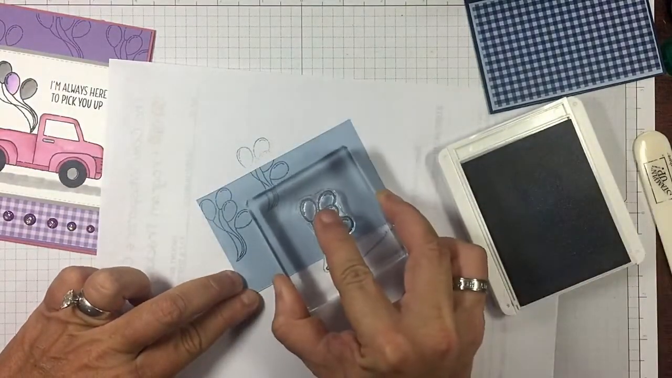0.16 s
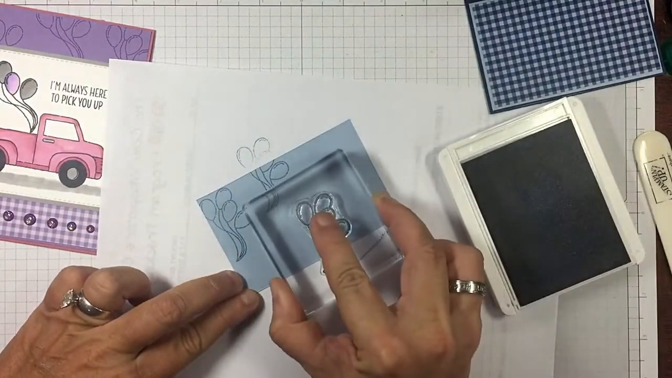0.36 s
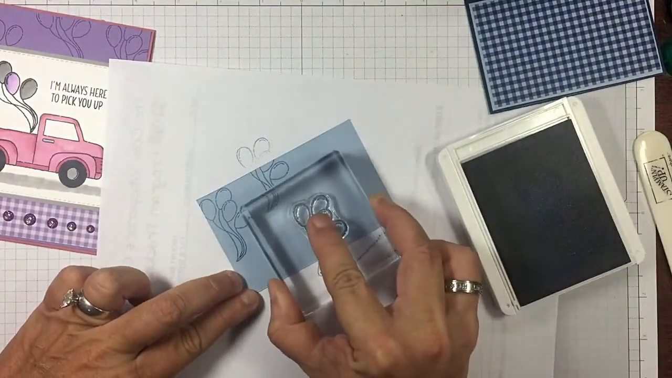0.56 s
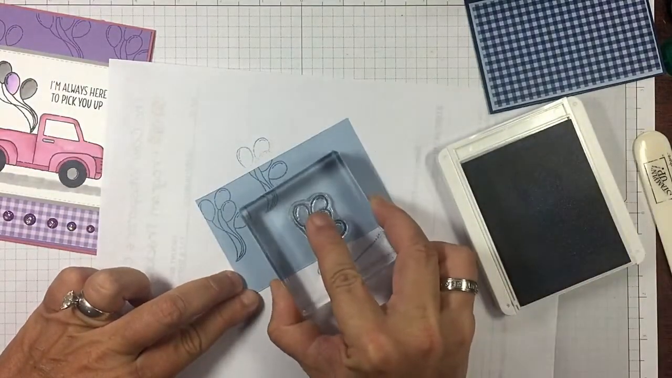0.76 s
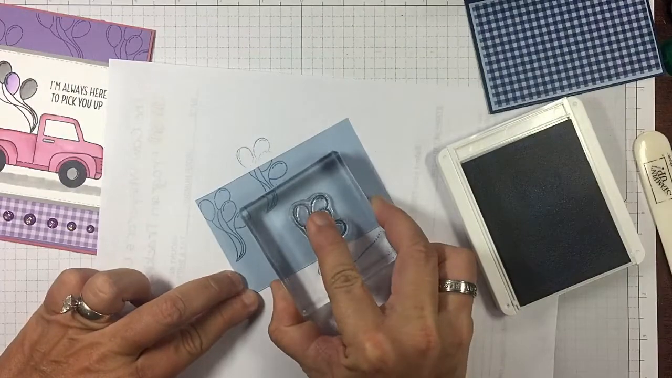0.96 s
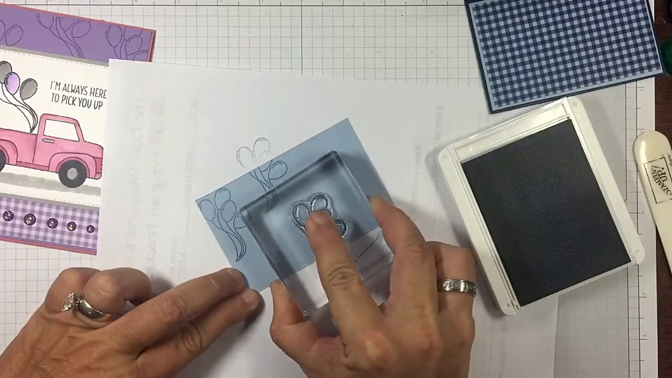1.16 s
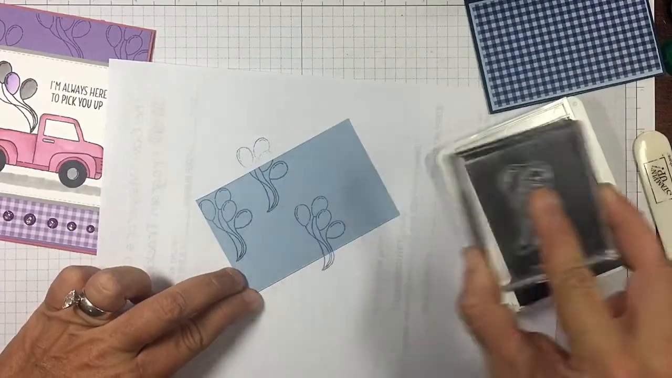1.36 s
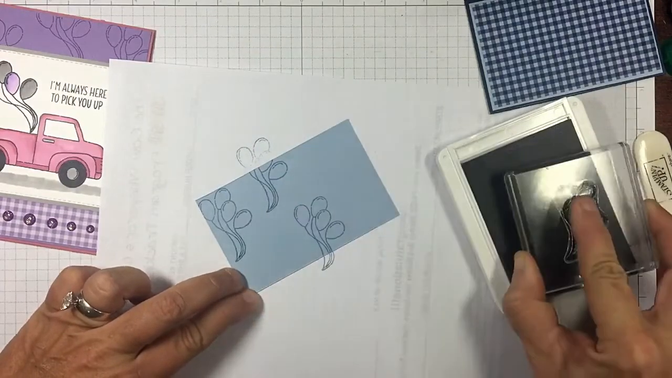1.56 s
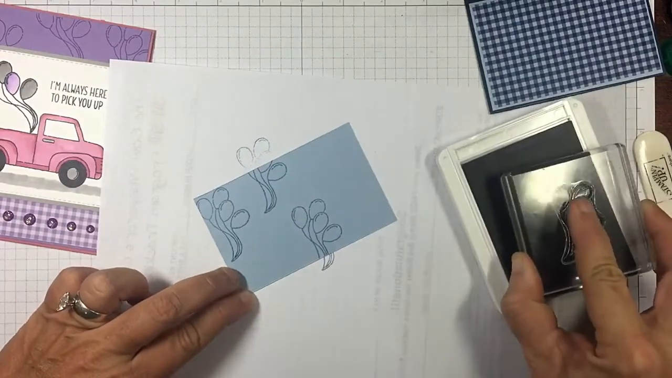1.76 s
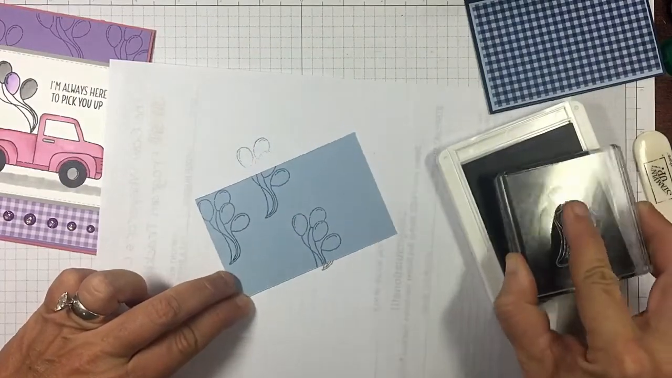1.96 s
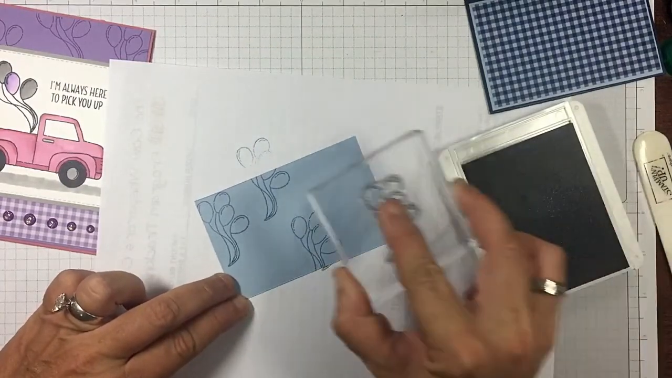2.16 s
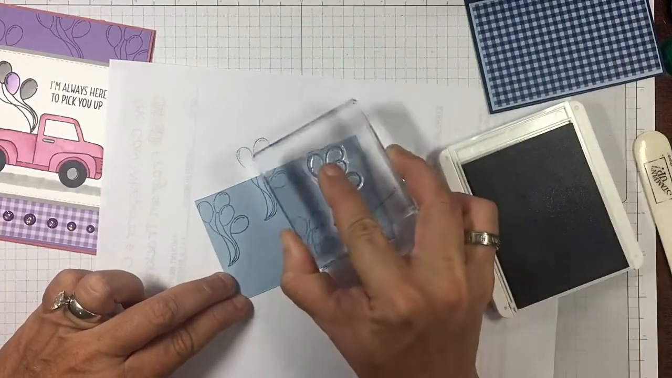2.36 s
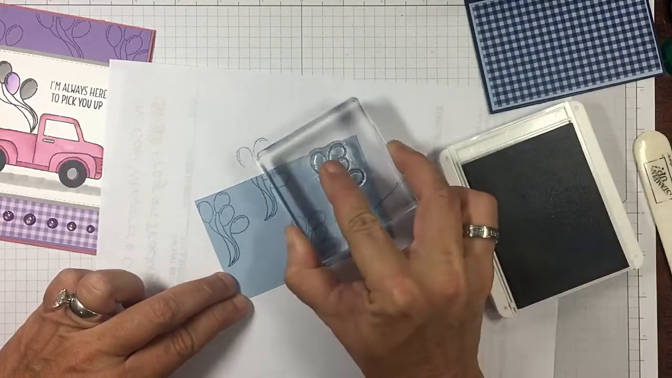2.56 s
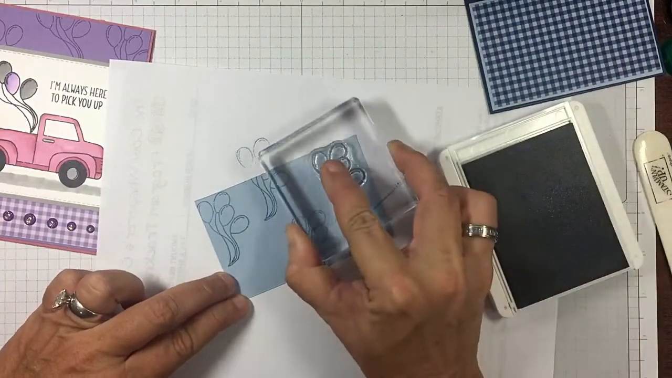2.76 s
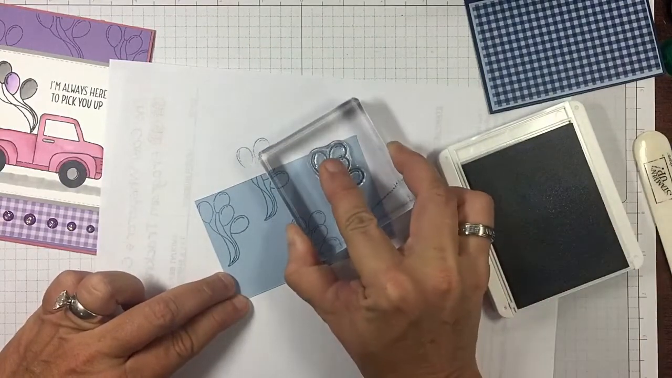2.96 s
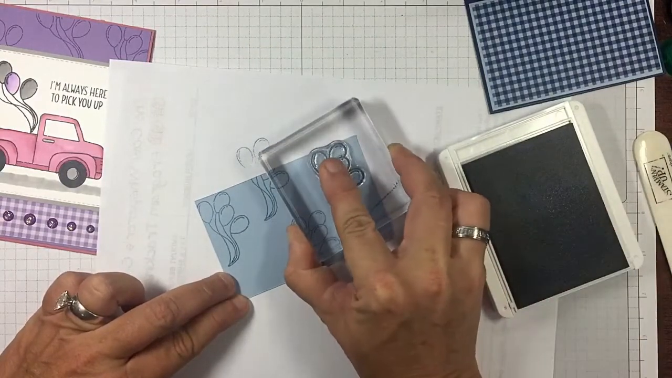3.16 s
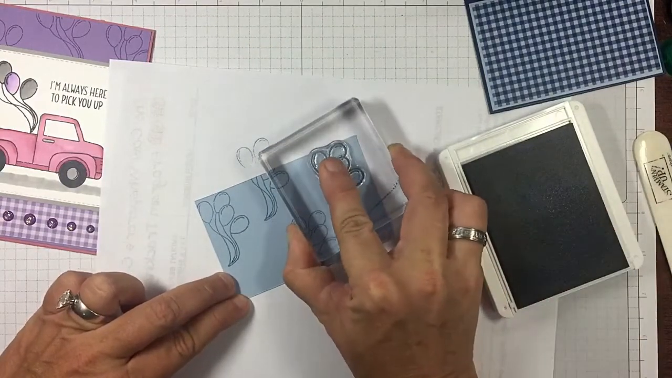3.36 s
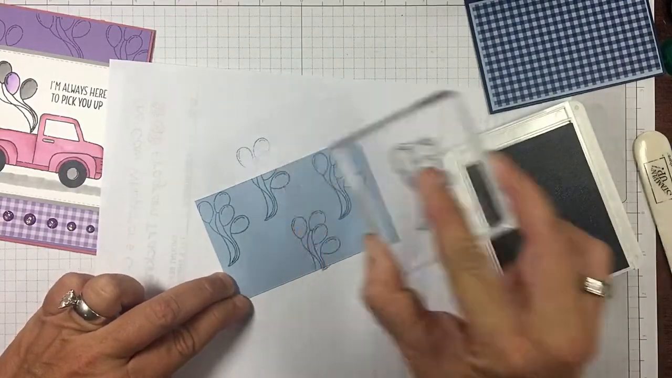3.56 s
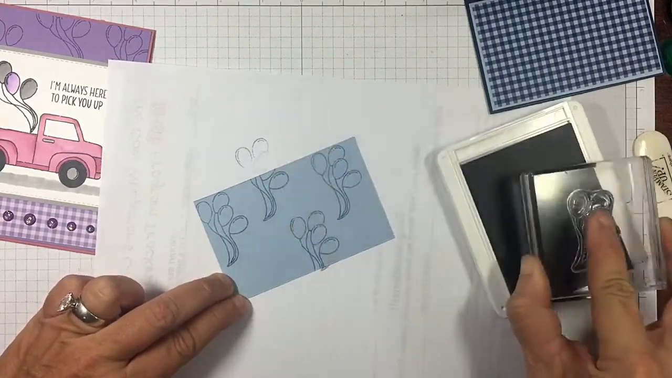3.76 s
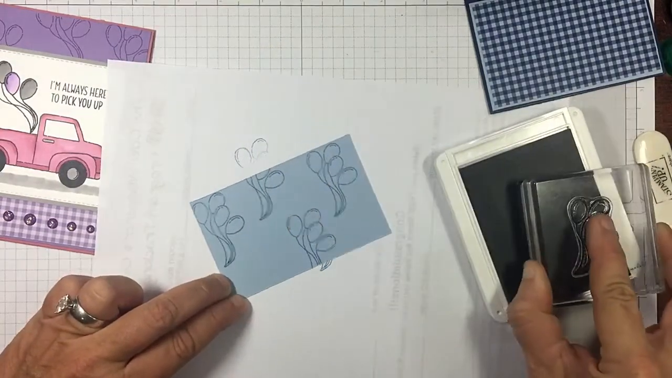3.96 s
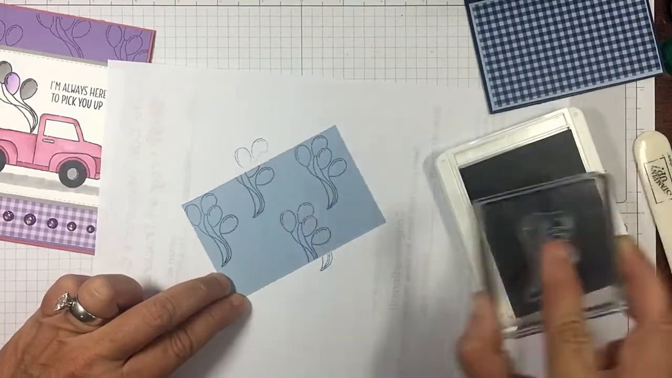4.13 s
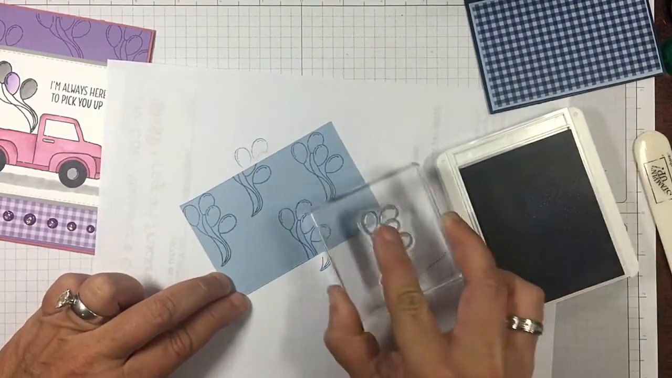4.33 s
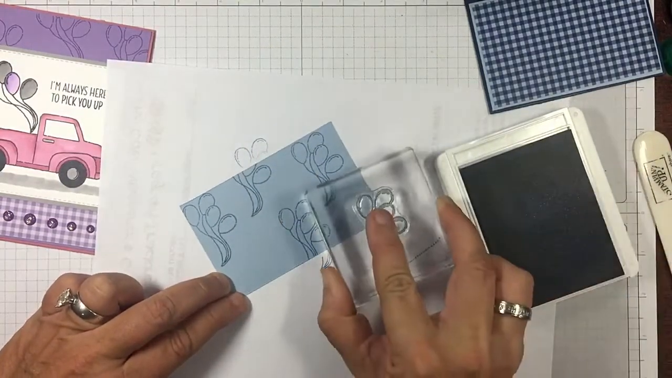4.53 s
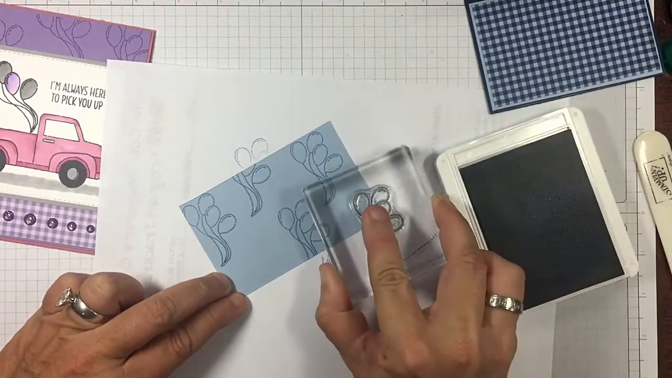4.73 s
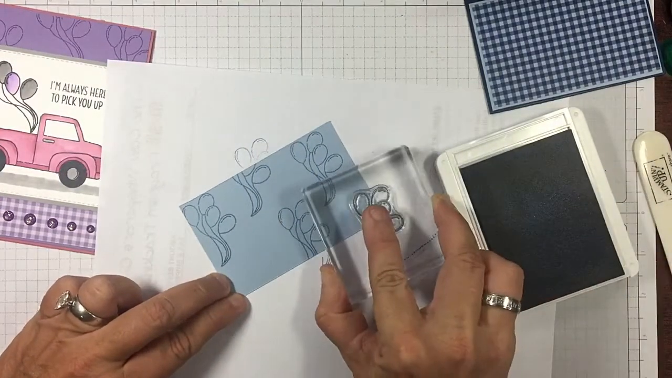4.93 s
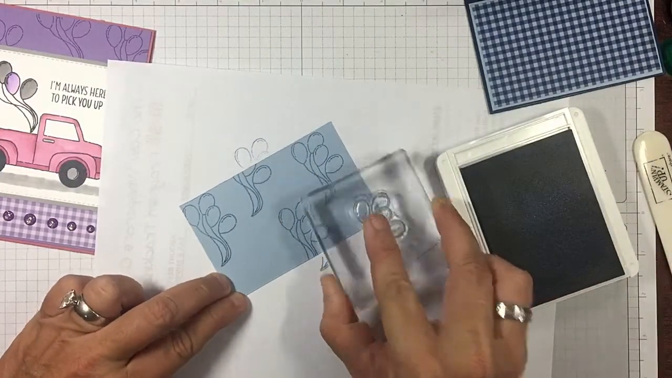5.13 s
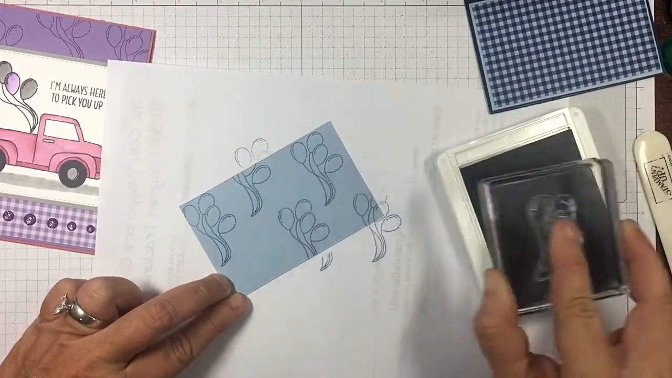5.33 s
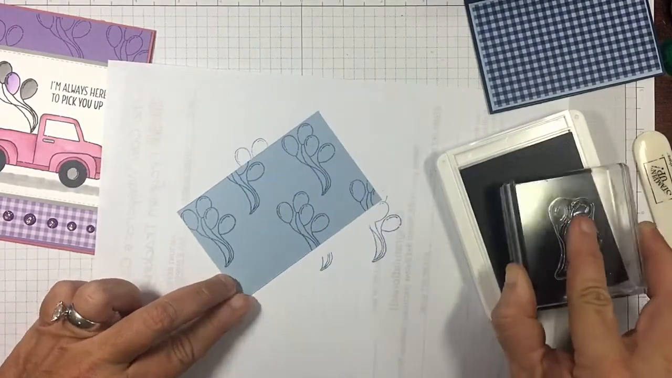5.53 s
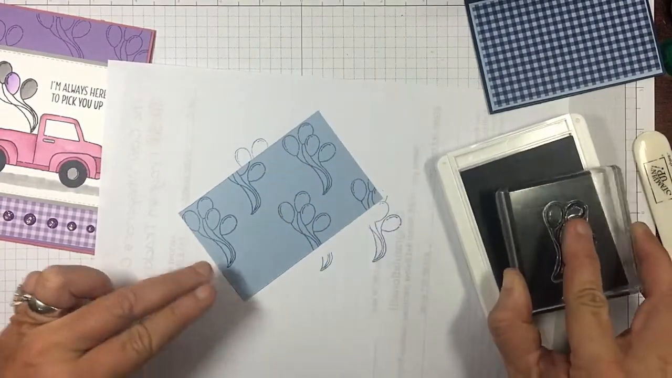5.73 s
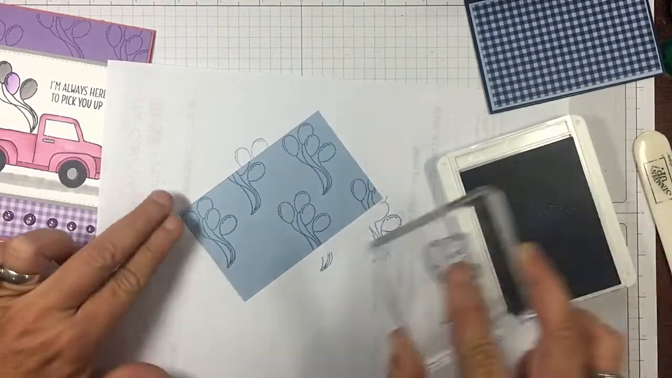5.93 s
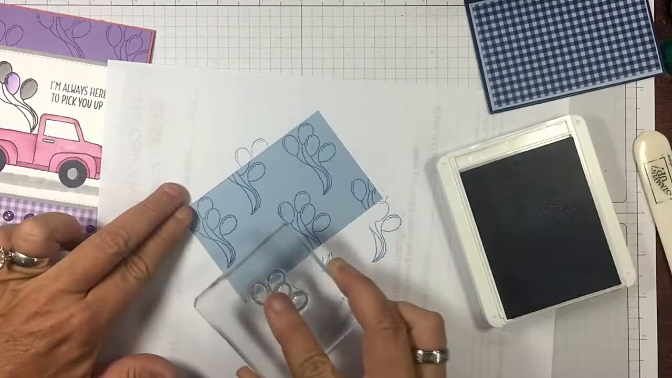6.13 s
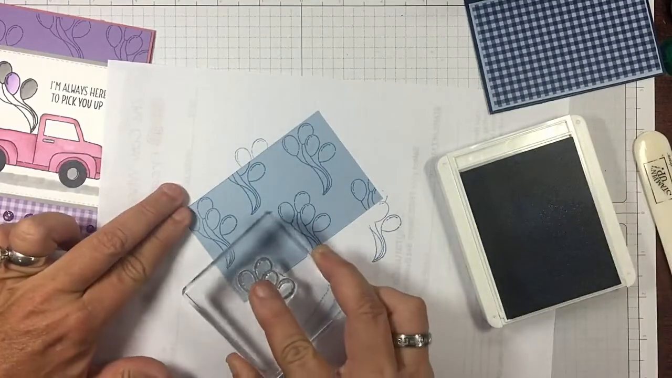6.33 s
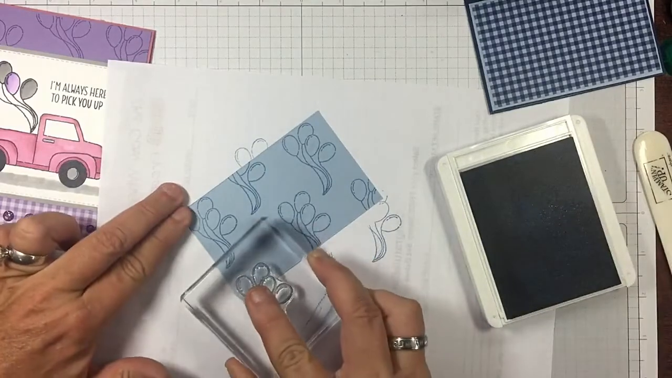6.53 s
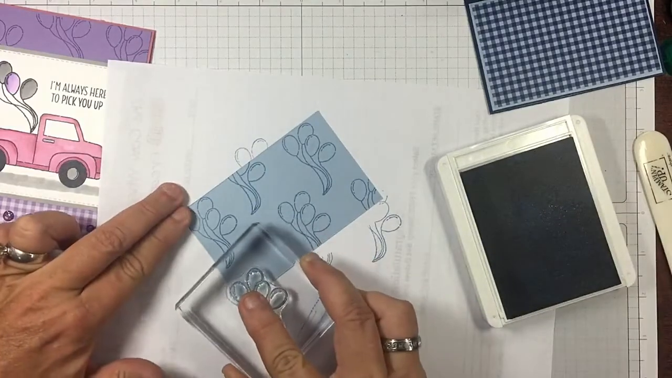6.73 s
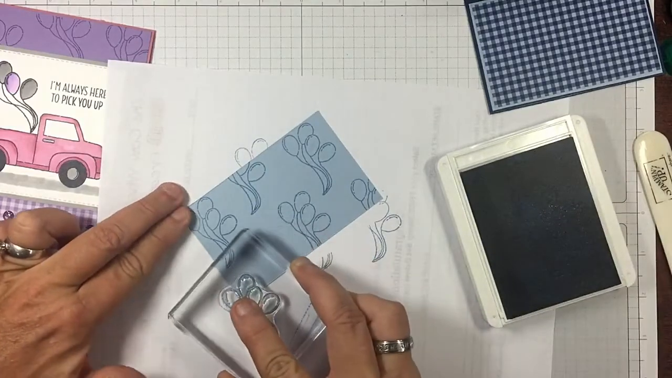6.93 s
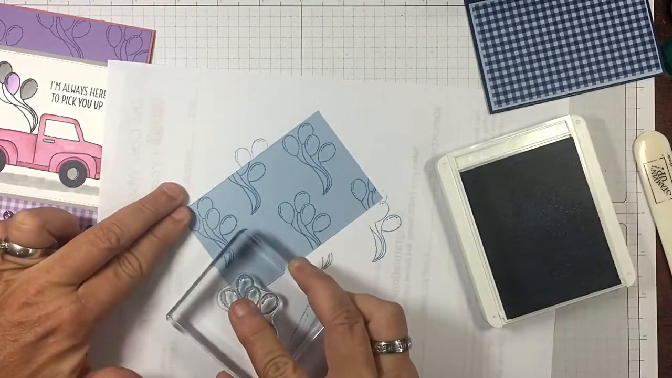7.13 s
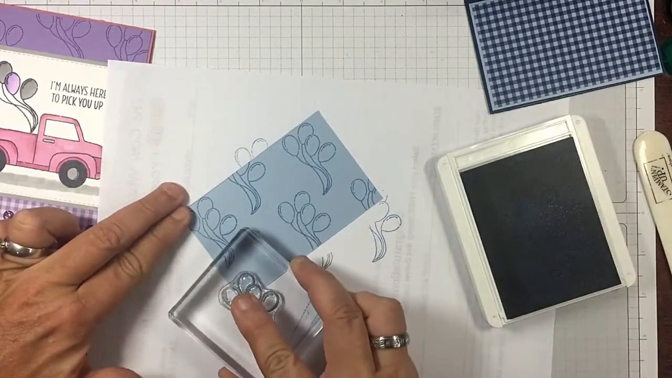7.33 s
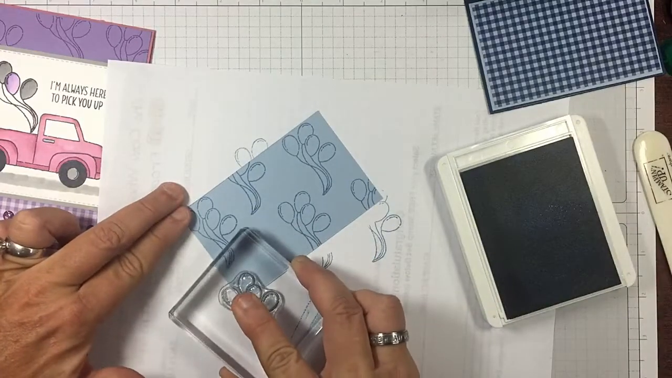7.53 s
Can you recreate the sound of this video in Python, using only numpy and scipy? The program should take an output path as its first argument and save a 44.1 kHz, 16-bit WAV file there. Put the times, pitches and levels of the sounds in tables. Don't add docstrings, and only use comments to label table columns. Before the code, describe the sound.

In a quiet room, a stamp block presses card with a low tabletop thump, then peels away with a sharp snap. Three quick plastic clacks follow on the ink pad, each with a woody thud. A faint press and light peel come next, two more taps, a heavy press, a softer peel, three taps, and a final deep press. The close microphone picks up table vibration over faint hiss.

```python
import sys
import numpy as np
from scipy import signal
from scipy.io import wavfile
from scipy.ndimage import uniform_filter1d

SR = 44100
rng = np.random.default_rng(int(sys.argv[2]) if len(sys.argv) > 2 else 0)


def decibels_to_gain(level_db):
    exponent = np.asarray(level_db, float) / 20
    return 10 ** exponent


def wav_out(sig):
    wavfile.write(sys.argv[1], SR, np.round(np.clip(np.atleast_2d(sig).T, -1, 1) * 32767).astype(np.int16))


N = 339129

# (frequency [Hz], density [dB per Hz])
HISS_SPECTRUM = [(88, 3), (150, -6), (230, -5), (263, -10.5), (296, -6.5), (333, -7), (797, -12),
                 (878, -11.5), (1400, -12.5), (1630, -10.5), (1870, -11), (2060, -11), (4850, -18.5),
                 (13300, -24), (15600, -26)]
# (frequency [Hz], density [dB per Hz])
RUMBLE_SPECTRUM = [(11, -58), (18, -28), (21, -16), (31, -8), (54, 4), (98, -2.5), (129, -7.5), (151, -8.5),
                   (250, -12.5), (320, -14.5), (550, -120)]

# (time [s], snap [dB], crackle [dB], crackle tail [s], creak [dB])
PEELS = [
    (1.255, -22, -58, 0.0096, -58),
    (3.1343, -69, -91, .004, -83),
    (3.5231, -39, -66.5, 0.0031, -81),
    (3.5300, -31, -62, 0.0094, -93),
    (5.178, -42, -65.5, 0.0073, -87),
]
# (time [s], level [dB], pitch [Hz], length [s])
FIZZES = [
    (2.012, -70.5, 4840, 0.0073),
    (3.869, -62, 4400, .0033),
    (4.05, -69.5, 10400, .012),
    (4.053, -69, 5000, 0.02),
    (4.114, -71, 4020, 0.014),
    (4.765, -66, 2500, 0.0034),
    (5.514, -53, 4170, 0.0017),
    (5.73, -71, 5600, .0041),
    (5.863, -68.5, 5130, .0069),
]
# (frequency [Hz], width [Hz], level [dB])
CARD_MODES = [(1470, 380, -4.5), (2810, 87, -10.5), (3490, 1670, 5), (4230, 1060, 0), (4960, 780, -7),
              (8000, 3100, -9), (10400, 680, -15), (11150, 1200, -11.5)]

# (time [s], level [dB], hardness [dB per octave], swell [s])
LANDINGS = [
    (1.596, -36, -1.5, .0081),
    (1.797, -30.5, 0, 0.0052),
    (1.932, -32.5, .5, .003),
    (3.8686, -30.5, -2, 0.005),
    (4.011, -33, 0.5, 0.0037),
    (5.527, -29.5, -2, 0.011),
    (5.67, -38.5, -3.5, 0.0092),
    (5.798, -33.5, -4, 0.0031),
]
# (time [s], level [dB], table sway [dB], hardness
# [dB per octave], swell [s])
LIFTS = [
    (1.705, -40, -47, 0.5, 0.0087),
    (1.872, -45, -62, 4, 0.03),
    (2.038, -55, -45, 9, .0035),
    (3.942, -44, -45, 1.5, 0.019),
    (4.134, -46.5, -45, 1, 0.007),
    (5.606, -41.5, -57, 5.5, 0.0055),
    (5.745, -39, -46, -2.5, .0044),
    (5.876, -37, -40.5, 4, 0.0041),
    (7.341, -47, -80, 10.5, 0.0052),
]
# (time [s], level [dB], ring factor)
PRESSES = [
    (0.6961, -25, 1.37),
    (4.7783, -22, 1.38),
    (7.3351, -22, 1.44),
]
# (time [s], level [dB], ring factor)
CORNER_PRESSES = [
    (2.9556, -46, 1.1),
]
# (time [s], level [dB], table sway [dB], hardness [dB per octave])
NUDGES = [(.44, -67, -62, -4), (.812, -57.5, -75, -5), (0.874, -58, -81, -7), (1.04, -60.5, -68, 5),
          (1.267, -51, -80, 19), (2.099, -69.5, -69, -14), (2.149, -74, -56, -12), (3.088, -61, -74, 5),
          (3.189, -81, -56.5, -13), (3.540, -50, -75, 13.5), (4.63, -53, -63, 10), (4.861, -54, -57, -2),
          (4.906, -58.5, -64, -12.5), (4.958, -61, -76, -12), (5.202, -55.5, -64, 4),
          (5.433, -55.5, -61, 6), (5.949, -55, -51, -5.5), (7.409, -53, -79, -3), (7.491, -57.5, -58, -6.5)]
# (frequency [Hz], t60 [s], landing [dB], lift [dB], press [dB], corner press [dB])
TABLE_MODES = [(101.2, 0.13, 0, -10, -4.5, 8.5), (114, 0.041, -53, -16, -7.5, -3),
               (194, 0.078, -4, -1.5, -10, 3.5), (273.8, 0.075, -10, -3.5, -10, -5.5),
               (317.4, 0.11, -10.5, -9, -26.5, -43), (387.2, 0.11, -12.5, -26, -38.5, -38),
               (456, 0.076, -40, -48, -33, -40), (562, 0.064, -11.5, -17, -38, -38),
               (650, 0.058, -48, -20.5, -38, -44)]
# (frequency [Hz], t60 [s], level [dB])
SWAY_MODES = [(52.16, 0.74, -7.5), (65.6, 0.21, -5)]
# (bass lag [s per octave], first arrival before crest [s], damping by the hand [s])
ARRIVALS = [(0.0062, 0.011, 0.19), (0.008, 0.0206, 0.24), (0.0056, 0.0144, 0.09), (0.0059, .016, 0.045)]

# (time [s], level [dB], pitch [Hz], length [s], hard edge [dB])
STRIKES = [(1.578, -39, 840, 0.0049, 1), (1.781, -29.5, 1110, 0.0049, -12),
           (1.7815, -37, 2560, 0.00287, 15.5), (1.859, -28, 920, 0.0043, -22),
           (1.9174, -20.5, 1120, .0013, -3), (1.9178, -37, 1900, 0.00036, 14),
           (3.854, -31, 1360, 0.00257, 11), (3.8552, -25, 740, .0023, 14.5), (3.92, -37.5, 1420, 0.0067, 9),
           (3.997, -31, 720, 0.0019, 14), (3.9976, -32, 1800, 0.0012, -10),
           (5.512, -28.5, 1900, 0.00294, 2), (5.516, -28.5, 930, 0.0032, 6),
           (5.656, -38.5, 1300, 0.0027, -6), (5.782, -38, 1660, 0.0043, 5), (5.858, -42.5, 1300, 0.013, 1),
           (6.442, -61, 1500, .0025, -6)]
# (time [s], level [dB], pitch [Hz], length [s])
SCRAPES = [(0.676, -42, 675, 0.0044), (1.691, -42, 1800, 0.0091), (1.845, -44, 1400, .0037),
           (1.908, -51, 850, 0.0052), (2.004, -47, 1370, 0.009), (2.941, -71, 520, 0.0015),
           (3.517, -51, 1430, .006), (4.036, -50, 1650, 0.0091), (4.104, -48, 1300, 0.01),
           (4.766, -52.5, 586, 0.0033), (5.591, -38.5, 740, 0.0081), (5.723, -38, 755, 0.011),
           (5.808, -54, 1600, 0.014), (5.847, -46.5, 1220, 0.0091), (7.322, -51, 1010, 0.0038)]
# (frequency [Hz], width [Hz], level [dB])
CASE_MODES = [(520, 290, 7), (720, 190, 0.5), (873, 276, 5), (1007, 280, 1.5), (1420, 262, 6),
              (1650, 148, -3.5), (1874, 120, 0), (2560, 87, -21), (3330, 210, -23.5), (4360, 240, -33),
              (5700, 470, -39)]

LANDING, LIFT, PRESS, CORNER_PRESS = range(4)
PEEL_PRE_S, THUD_PRE_S, CLATTER_PRE_S = 0.06, 0.04, 0.03


def evened(x):
    return x / np.sqrt(np.mean(x ** 2) + 1e-20)


def add(mix, time_s, sound):
    part = mix[round(time_s * SR):][:len(sound)]
    part += sound[:len(part)]


def resonate(x, hz, width_hz):
    turn = np.exp(2j * np.pi * hz * np.arange(len(x)) / SR)
    r = np.exp(-np.pi * width_hz / SR)
    smoother = 3 * [[1 - r, 0, 0, 1, -r, 0]]
    return 2 * (turn * signal.sosfilt(smoother, x / turn)).real


def hump(t, before_s, after_s):
    rise = np.exp(-0.5 * (t / before_s) ** 2)
    fall = np.exp(-np.maximum(t, 0) / after_s)
    return np.where(t < 0, rise, fall)


def gritty(count, density):
    force = rng.standard_normal(count) * rng.exponential(1, count)
    return force * (rng.random(count) < density)


def noise(spectrum, patchy_db):
    bin_hz = np.fft.rfftfreq(2048, 1 / SR)
    real, imag, patches = rng.standard_normal((N // 512 + 5, 1025, 3)).T
    patches = uniform_filter1d(patches, size=20, axis=0)
    patches = evened(uniform_filter1d(patches, size=12, axis=1))
    hz, db = np.transpose(spectrum)
    colour_db = np.interp(np.log(bin_hz + 1), np.log(hz), db, left=-90, right=-90)
    z = (real + 1j * imag) * decibels_to_gain(colour_db[:, None] + patchy_db * patches)
    return evened(signal.istft(z, nperseg=2048, noverlap=1536)[1][:N])


def room_floor():
    return decibels_to_gain(-69) * noise(HISS_SPECTRUM, 1.0) + decibels_to_gain(-67) * noise(RUMBLE_SPECTRUM, 0.92)


def reflections(x):
    t = np.arange(SR // 3) / SR
    taps_per_s, first_s = 2000, 0.004
    taps = rng.choice([-1., 1.], len(t)) * (rng.random(len(t)) < taps_per_s / SR) * (t > first_s)
    dull = signal.lfilter([0.2], [1, -0.8], taps)
    tail = dull * decibels_to_gain(-60 * t / 0.33) + 1.1 * taps * decibels_to_gain(-60 * t / 0.17)
    return signal.fftconvolve(x, tail / np.linalg.norm(tail))[:N]


def fizz(db, hz, length_s):
    t = np.arange(SR // 5) / SR - PEEL_PRE_S
    band = resonate(rng.standard_normal(len(t)), hz, 0.51 * hz)
    return decibels_to_gain(db) * evened(band) * hump(t, length_s, length_s)


def peel(snap_db, crackle_db, crackle_tail_s, creak_db):
    t = np.arange(SR // 5) / SR - PEEL_PRE_S
    grit = gritty(len(t), 0.6)
    click = 1.5 * (abs(t) < 0.5 / SR)
    blow = click + 0.3 * rng.standard_normal(len(t)) * hump(t, 0.00015, 0.0004)
    snap, crackle, creak = np.zeros((3, len(t)))
    for hz, width_hz, db in CARD_MODES:
        snap += np.sign(hz - 2000) * decibels_to_gain(db) * evened(resonate(blow, hz, 1.57 * width_hz))
        fade = hump(t, 0.003, crackle_tail_s * min(4500 / hz, 1))
        crackle += decibels_to_gain(db) * evened(resonate(grit, hz, 1.3 * width_hz)) * fade
    for hz, late_s, tail_s in [(1600, -0.0044, 0.01), (1300, 0.014, 0.032)]:
        creak += evened(resonate(grit, hz, 400)) * hump(t - late_s, 0.022, tail_s)
    torn = decibels_to_gain(snap_db) * snap / abs(snap).max() + decibels_to_gain(crackle_db + 7) * crackle + decibels_to_gain(creak_db) * creak
    return signal.sosfilt(signal.butter(4, 1150, "high", fs=SR, output="sos"), torn)


def inked_rubber():
    air = np.zeros(N)
    for time_s, *tear in PEELS:
        add(air, time_s - PEEL_PRE_S, peel(*tear))
    for time_s, *burst in FIZZES:
        add(air, time_s - PEEL_PRE_S, fizz(*burst))
    return air


def thud(kind, thud_db, sway_db, hard_db, swell_s, ring):
    t = np.arange(SR // 2) / SR - THUD_PRE_S
    lag_s_per_octave, first_s, damped_s = ARRIVALS[kind]
    on_card = kind >= PRESS
    crest_slip = 0.17 if on_card else 0
    hard_top_hz = 300 if on_card else 700
    modes = [(hz, t60_s, sway_db + db) for hz, t60_s, db in SWAY_MODES]
    for hz, t60_s, *kind_db in TABLE_MODES:
        tilt_db = hard_db * np.log2(min(hz, hard_top_hz) / 200)
        modes.append((hz, ring * t60_s, thud_db + kind_db[kind] + tilt_db))
    out = np.zeros(len(t))
    for hz, t60_s, db in modes:
        lag_s = lag_s_per_octave * np.log2(280 / hz)
        shape = hump(t - lag_s, abs(swell_s) + 0.5 * max(lag_s, 0), abs(t60_s) / np.log(1000))
        mode_hz = hz * rng.normal(1, 0.008)
        out += decibels_to_gain(db) * shape * np.cos(2 * np.pi * mode_hz * (t - crest_slip * lag_s))
    out *= np.clip((t + first_s) / 0.00074, 0, 1)
    out *= np.exp(-(np.maximum(t, 0) / damped_s) ** 2)
    return -out if on_card else out


def tabletop():
    wood = np.zeros(N)
    ring_per_s = 55
    blows = []
    for time_s, db, hard_db, swell_s in LANDINGS:
        sway_db = -33.5 + 0.6 * (db + 32)
        blows.append((time_s, LANDING, db, sway_db, hard_db, swell_s, 0.88 + ring_per_s * swell_s))
    for time_s, *lift, swell_s in LIFTS:
        blows.append((time_s, LIFT, *lift, swell_s, 1 + ring_per_s * swell_s))
    for kind, rows in [(PRESS, PRESSES), (CORNER_PRESS, CORNER_PRESSES)]:
        for time_s, db, ring in rows:
            blows.append((time_s, kind, db, -69, 6, 0.0075, ring))
    for time_s, db, sway_db, hard_db in NUDGES:
        swell_s = 0.019 - 2.44 * hard_db
        blows.append((time_s, PRESS, db, sway_db, hard_db, swell_s, 0.78 + 0.1 * hard_db))
    for time_s, *blow in blows:
        add(wood, time_s - THUD_PRE_S, thud(*blow))
    return wood


def clatter(db, pitch_hz, length_s, lead_s, edge_db):
    t = np.arange(SR // 6) / SR - CLATTER_PRE_S
    grit = gritty(len(t), 0.3)
    strike = 9.5 * np.exp(-lead_s / 0.00094)
    out = np.zeros(len(t))
    for hz, width_hz, mode_db in CASE_MODES:
        late = t - 0.553 * length_s * max(1800 / hz - 1, 0)
        rattle = decibels_to_gain(-15.5) * hump(late, 3 * lead_s, 0.02)
        touch = hump(late, lead_s, length_s) + rattle
        drive = grit * touch
        drive[np.argmax(late > 0)] += strike
        near_db = 8 * np.exp(-(np.log(hz / pitch_hz) / 0.13) ** 2) + edge_db * (hz > 2200)
        ringing = evened(resonate(drive, hz, 2.14 * width_hz))
        out += decibels_to_gain(mode_db + near_db) * np.sqrt(width_hz) * ringing
    return decibels_to_gain(db) * out / abs(out).max()


def stamp_on_case():
    air = np.zeros(N)
    for time_s, db, hz, length_s, edge_db in STRIKES:
        add(air, time_s - CLATTER_PRE_S, clatter(db, hz, length_s, 0.00057, edge_db))
    for time_s, db, hz, length_s in SCRAPES:
        lead_s = 0.2 * length_s
        add(air, time_s - CLATTER_PRE_S, clatter(db, hz, length_s, lead_s, 1))
    return air


def scene():
    air = inked_rubber() + stamp_on_case()
    return (air + decibels_to_gain(-15.5) * reflections(air) + tabletop() + room_floor())[None]


def low_pass(x):
    return signal.sosfilt(signal.butter(12, 15700, fs=SR, output="sos"), x)


def record(dry):
    mix = signal.sosfilt(signal.butter(4, 39, "high", fs=SR, output="sos"), dry)
    return low_pass(mix)


dry = scene()
out = record(dry)
wav_out(out)
```